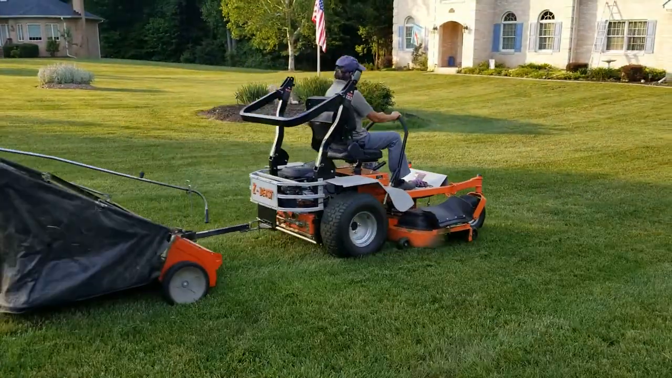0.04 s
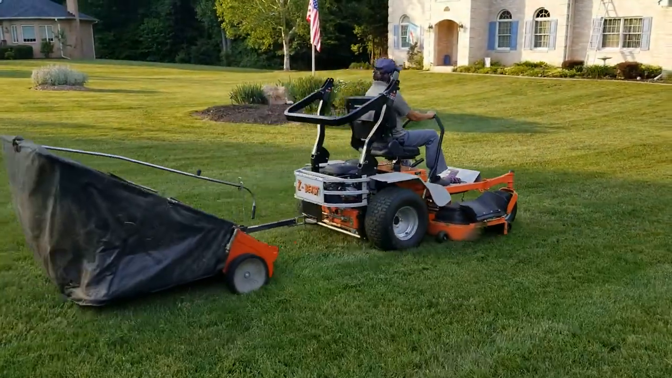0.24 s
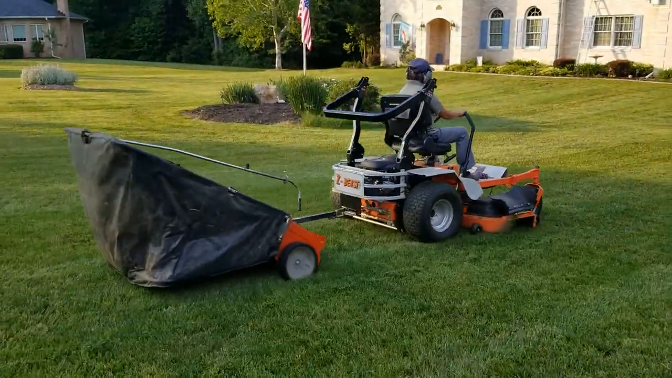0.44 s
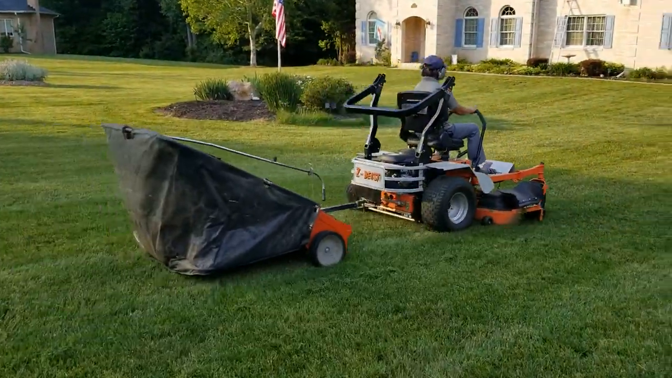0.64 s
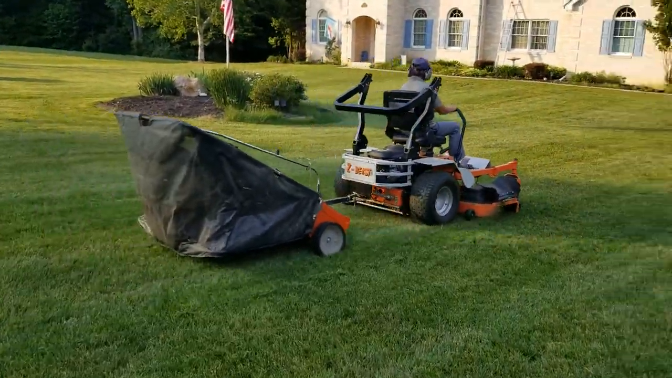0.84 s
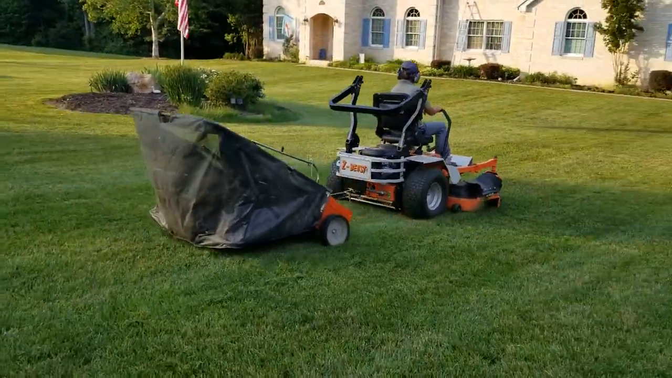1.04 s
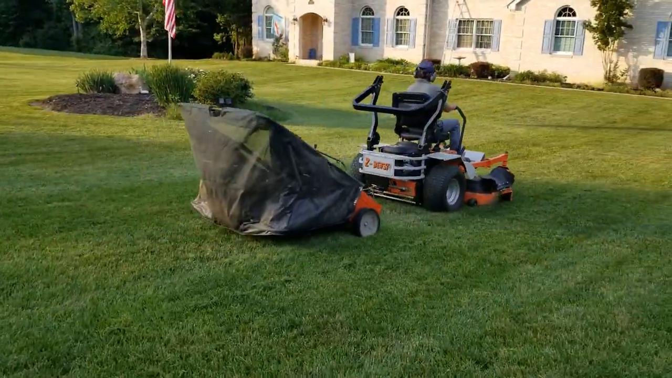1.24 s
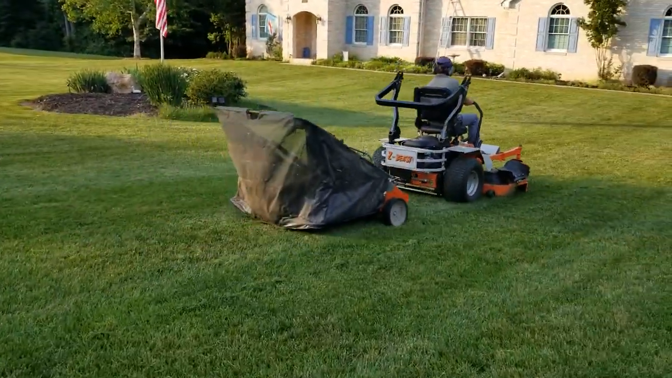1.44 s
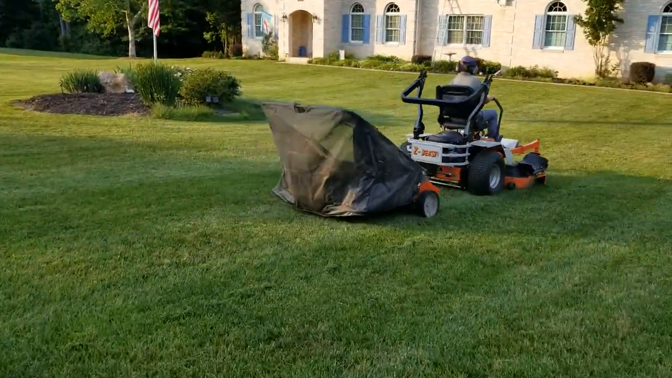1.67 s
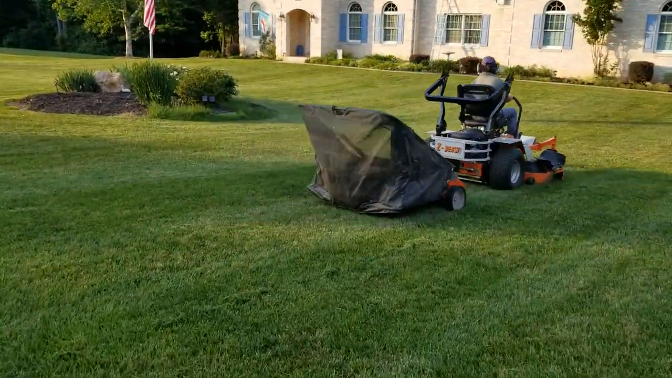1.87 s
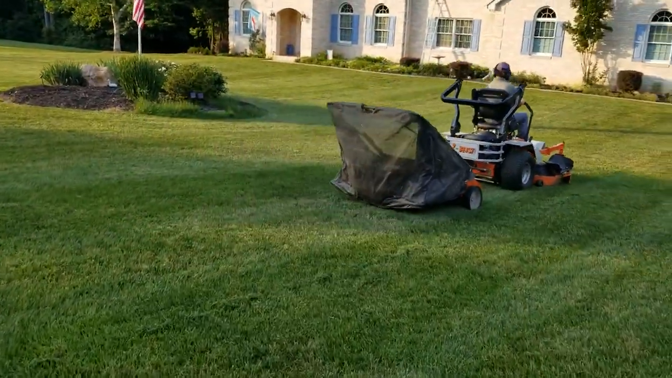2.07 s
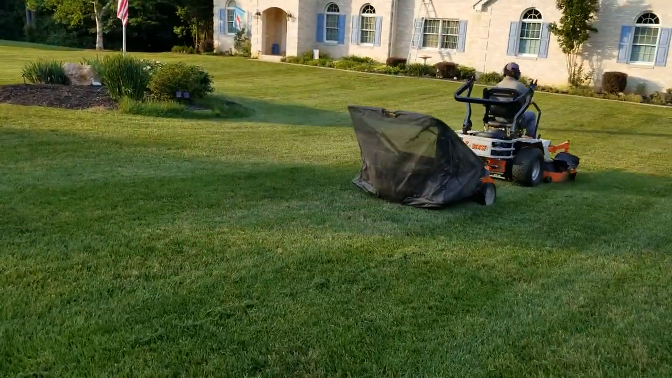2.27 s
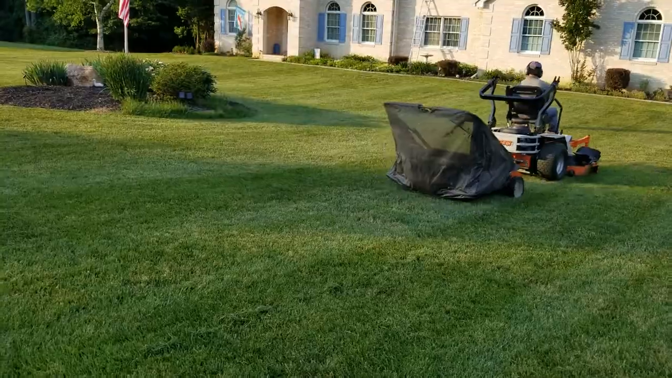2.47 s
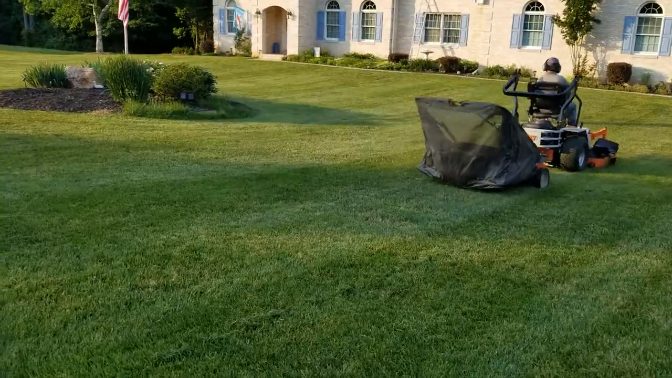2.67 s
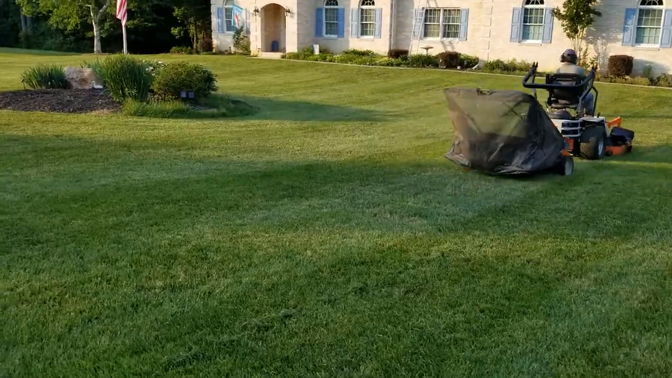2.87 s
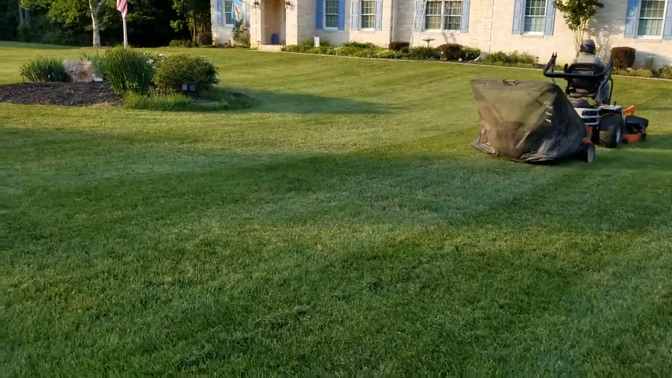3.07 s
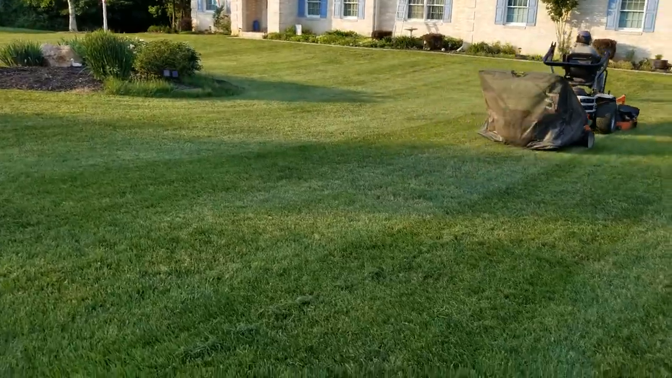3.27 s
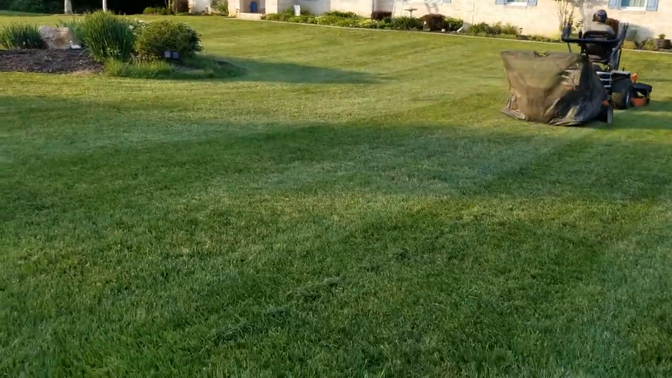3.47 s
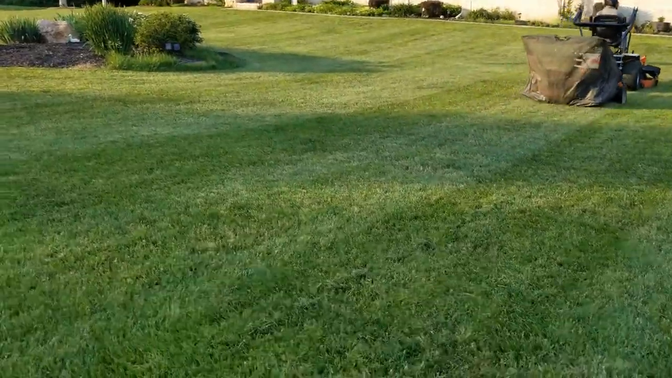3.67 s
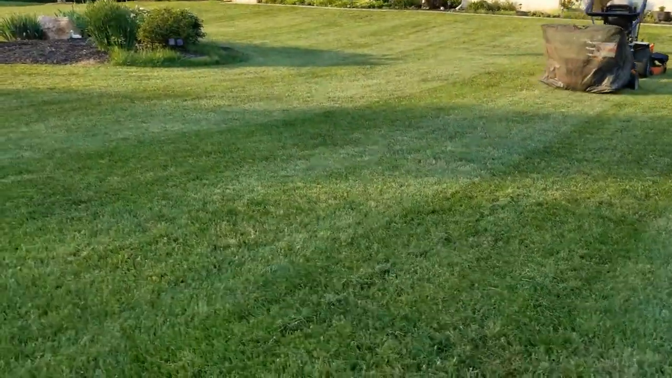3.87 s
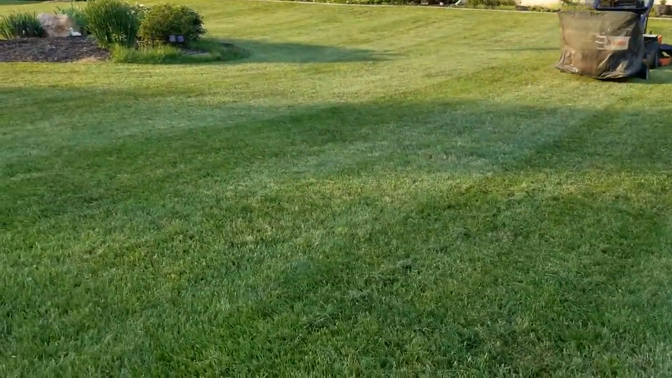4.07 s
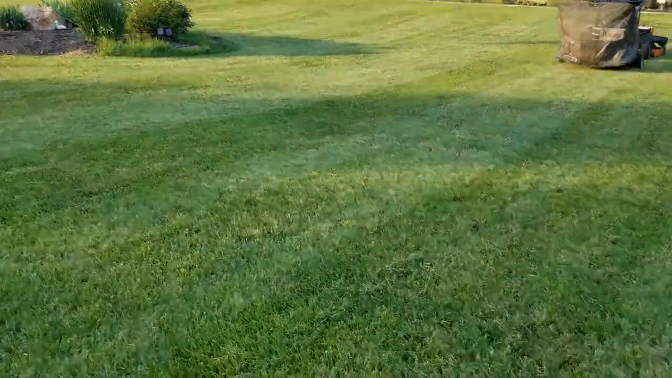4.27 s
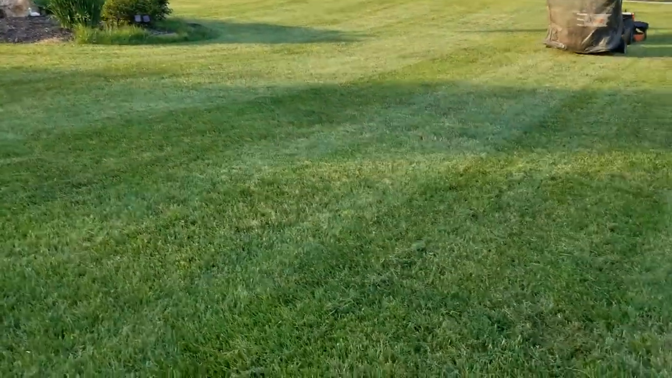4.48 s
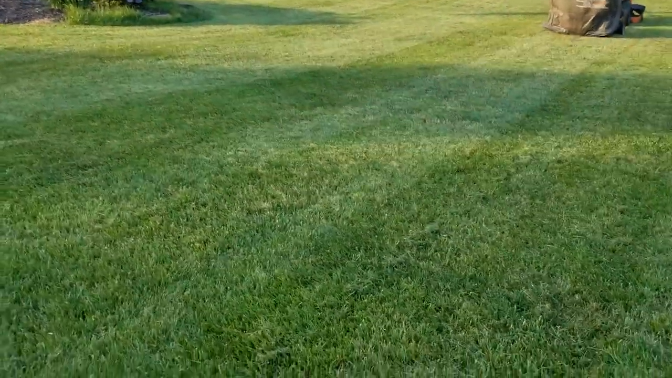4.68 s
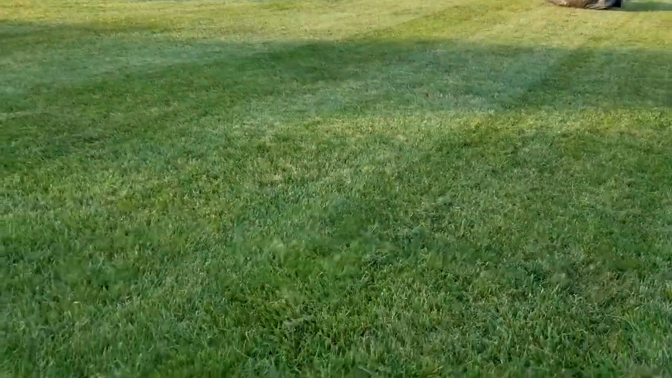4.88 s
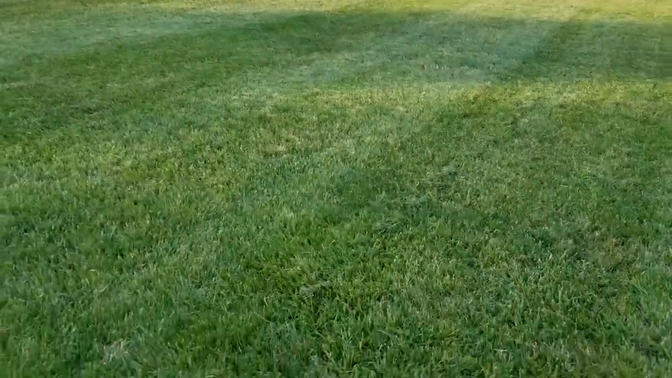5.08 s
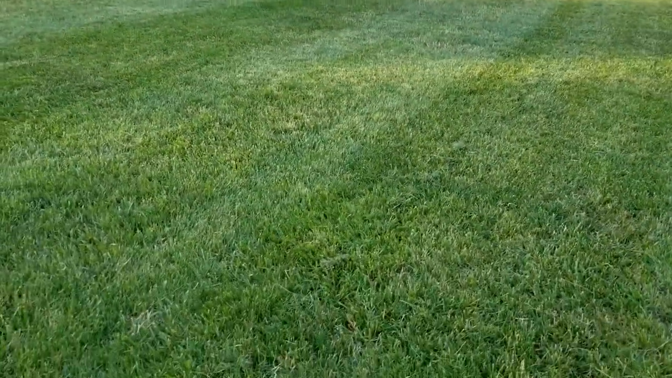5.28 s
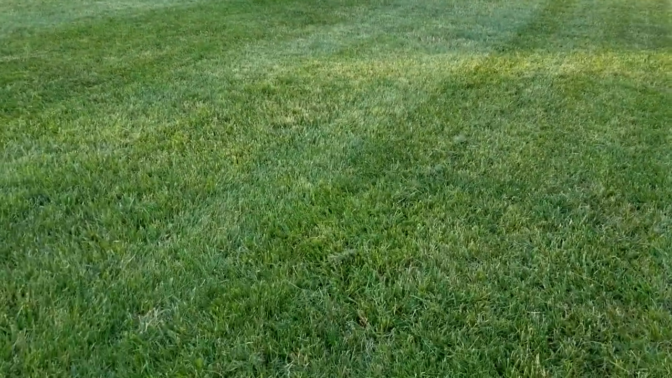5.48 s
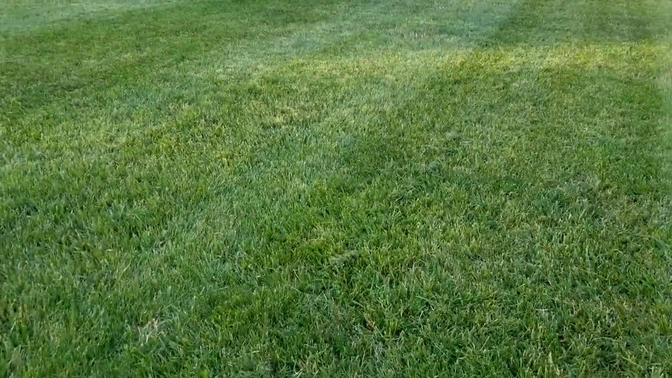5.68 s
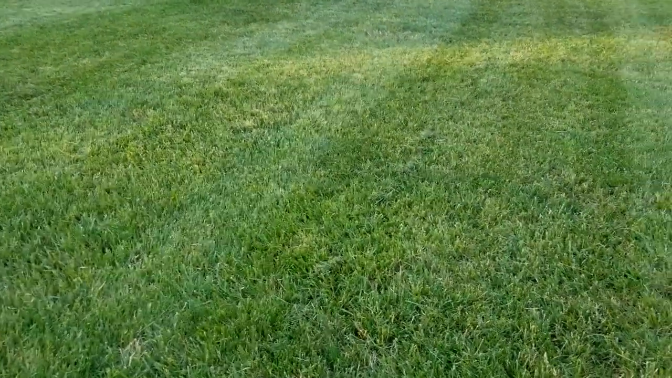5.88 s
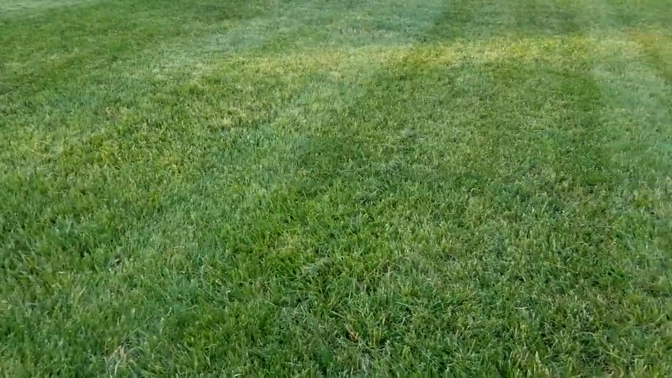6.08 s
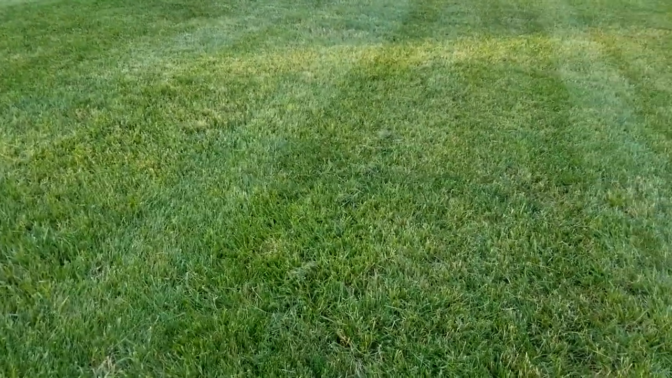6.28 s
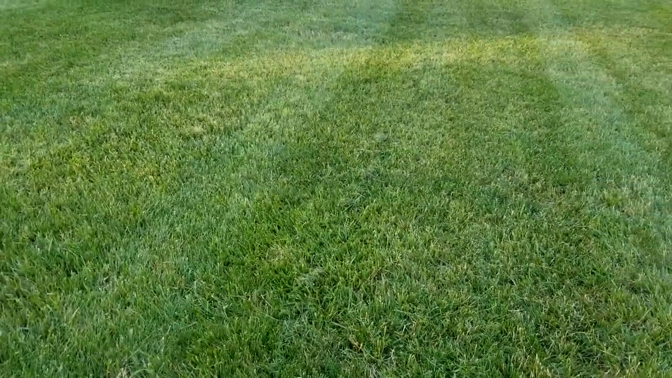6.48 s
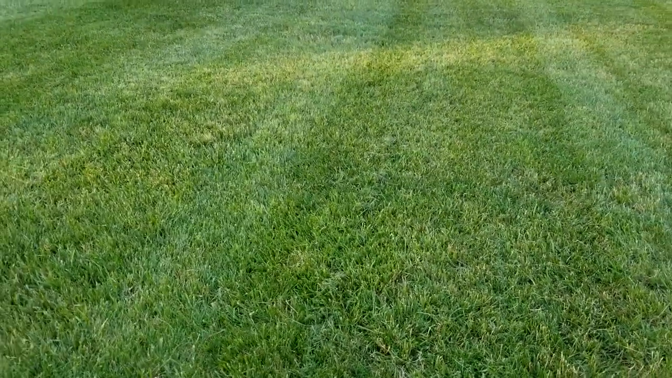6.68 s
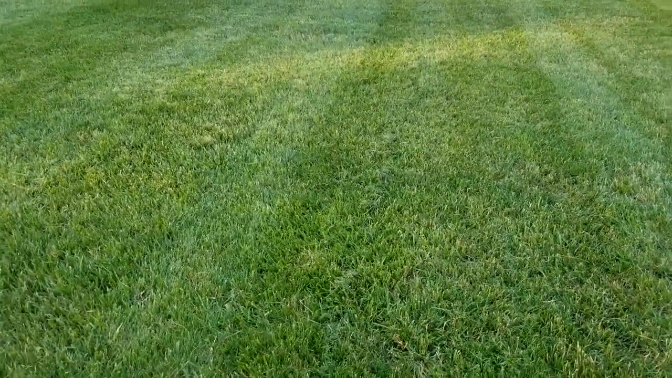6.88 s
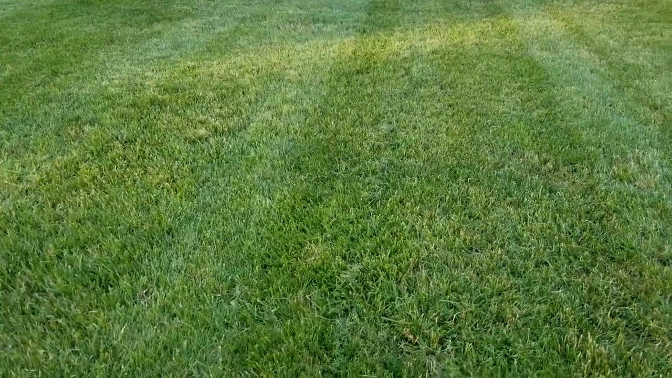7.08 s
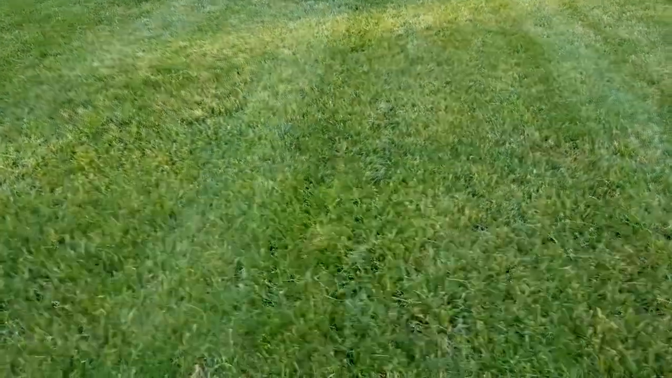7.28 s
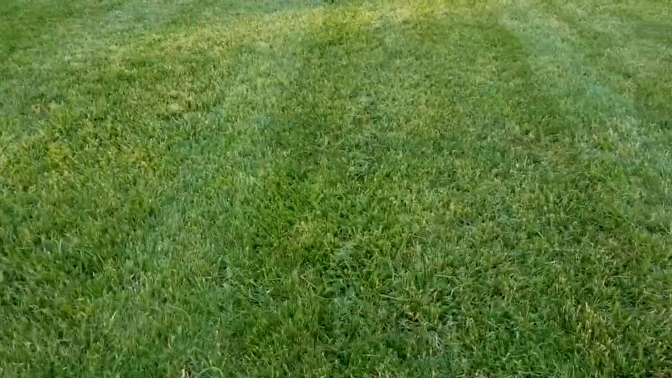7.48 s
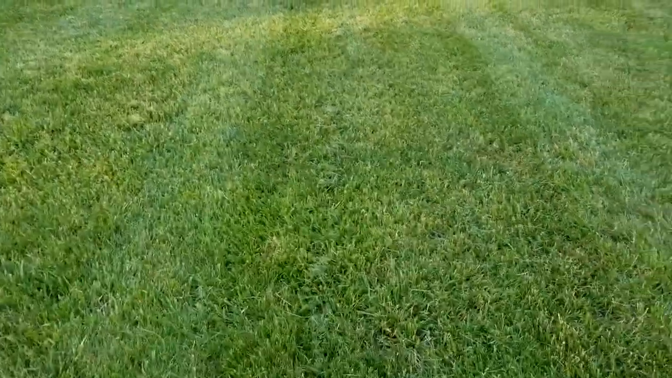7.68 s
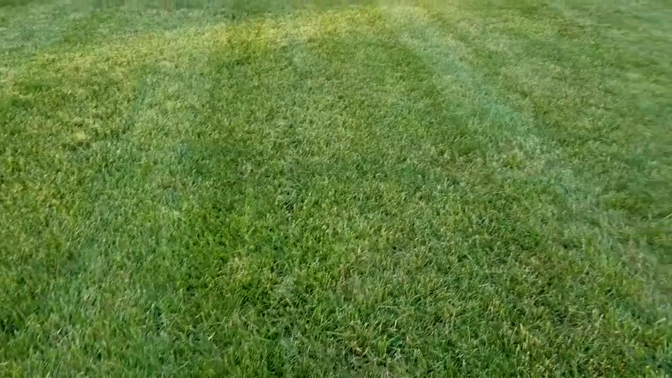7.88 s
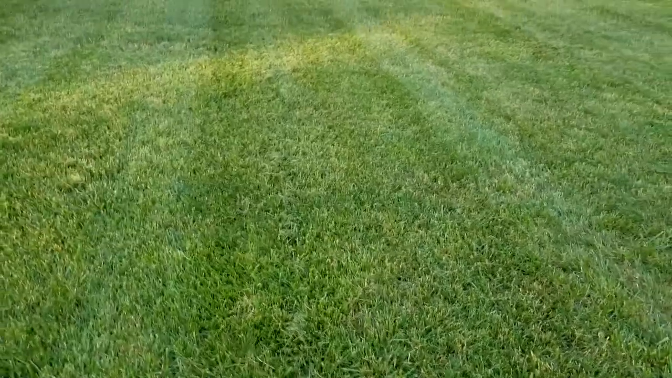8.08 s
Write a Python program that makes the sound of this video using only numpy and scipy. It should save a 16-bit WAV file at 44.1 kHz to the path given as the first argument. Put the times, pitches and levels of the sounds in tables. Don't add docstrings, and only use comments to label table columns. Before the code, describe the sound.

A ride-on petrol mower towing a lawn sweeper throbs and roars close by, then drives away over grass, fading to a distant low drone.

```python
import sys
import numpy as np
from scipy import signal
from scipy.fft import rfft, irfft
from scipy.io import wavfile
from scipy.ndimage import uniform_filter1d

SR = 44100
rng = np.random.default_rng(int(sys.argv[2]) if len(sys.argv) > 2 else 0)


def materialize(psi):
    bounded = np.clip(np.atleast_2d(psi).T, -1, 1)
    quanta = np.round(bounded * 32767).astype(np.int16)
    wavfile.write(sys.argv[1], SR, quanta)


def gain_from_db(level_db):
    decades = np.asarray(level_db, float) / 20
    return 10 ** decades


N = 358533
HOP = 256


def evened(x):
    return x / np.sqrt(np.mean(x ** 2) + 1e-20)


def read(points, hz):
    f, value = np.transpose(points)
    return np.interp(np.log(hz + 1), np.log(f + 1), value)


def curves(rows, t):
    s, *columns = np.transpose(rows)
    return np.array([np.interp(t, s, column) for column in columns])


def wander(hz):
    steps = rng.standard_normal(400)
    return np.interp(np.arange(N) / SR * np.clip(hz, .1, 40), np.arange(400), steps)


def swell(x, centre, width):
    return np.exp(-(2 * (x - centre) / width) ** 2)


# time in seconds, view (0 beside, 1 behind, 2 far).
VIEW_PATH = [(0, 0.066), (1.7, 0.0051), (2.2, 0.61), (2.7, 0.74), (3.1, 0.8), (5.5, 1.15), (5.85, 1.53),
             (8.13, 1.68)]


def view_at(t):
    return curves(VIEW_PATH, t)[0]


def by_view(view, versions, at=(0, 1, 2)):
    share = np.array([np.interp(view, at, row) for row in np.eye(len(at))])
    return np.transpose(versions) @ share


# time in seconds, speed in engine cycles per second.
ENGINE_SPEED = [(0.25, 28.74), (1.15, 29.87), (1.45, 30.14), (1.75, 29.95), (2.05, 29.565), (2.95, 28.99),
                (3.25, 29.03), (3.55, 29.26), (3.85, 29.17), (4.45, 29.15), (5.05, 29.38), (5.65, 29.155),
                (6.25, 29.16), (6.55, 29.03), (6.85, 29.16), (7.45, 29.86), (7.75, 30.48), (7.95, 30.52)]


def engine_speed(t):
    return curves(ENGINE_SPEED, t)[0]


# time in seconds, level in dB.
SILENCER_NOTE = [(0.0, -24), (0.04, -21), (0.77, -19.5), (1.02, -22.5), (2.81, -20.5), (4.44, -23.5),
                 (4.57, -22), (4.82, -25.5), (5.16, -23.5), (5.34, -27.5), (5.62, -23), (5.8, -26.5),
                 (6.52, -24.5), (6.7, -28), (7.06, -23), (7.45, -29), (7.88, -25.5), (8.13, -28.5)]
# starting level in dB, loss in dB per second, gain behind the pipe in dB,
# drift in dB, change after the last turn in dB.
ORDER_GROUPS = [
    (-33.5, 0.93, -1, 0.8, 2.5),
    (-28.5, 1.2, 4.5, 2, 0.7),
    (-33, 1.87, 2.5, 2.5, -10),
]
TURN_S, TURN_LENGTH_S = 7.6, 0.27
FIRING_DB, FIRING_HZ = 0.7, 27.13


def order_levels(t):
    behind = np.interp(view_at(t), (0, 1, 2), (0, 1, 0))
    turned = np.clip((t - TURN_S) / TURN_LENGTH_S + .5, 0, 1)
    deep, upper, top = (
        start_db - fade_db * t + pipe_db * behind + drift_db * wander(5) + turn_db * turned
        for start_db, fade_db, pipe_db, drift_db, turn_db in ORDER_GROUPS)
    stroke = wander(FIRING_HZ)
    stroke_db = FIRING_DB * (stroke - uniform_filter1d(stroke, SR // 8))
    note = curves(SILENCER_NOTE, t)[0]
    return np.array([deep, note + stroke_db, upper + stroke_db, top + stroke_db])


# order (multiple of the cycle rate),
# level curve it follows (0 deep, 1 main note, 2 upper, 3 top), level against that curve in dB.
EXHAUST_ORDERS = [(1, 0, -24), (2, 0, 0), (3, 0, -4), (4, 0, 0), (5, 1, 0), (6, 2, 0), (7, 2, -8),
                  (8, 3, 0), (9, 3, -7), (10, 3, -11), (11, 3, -21)]
# pitch in Hz, level in dB per Hz.
UNEVEN_COLOUR = [(15, -23), (45, -11), (73, -12), (100, -3.5), (118, -1), (134, 7.5), (162, -5),
                 (200, -3.5), (260, -4.5), (330, -21.5), (500, -41.5)]
# time in seconds, size against order 5 in dB.
UNEVEN_LEVEL = [(0, -16), (1.5, -15), (2.5, -12), (4, -11), (5, -11), (6.5, -13), (7.5, -16), (8.13, -14)]
SECOND_AT, SECOND_SHARE = .7625, .68


def exhaust(turns, levels_db):
    steady = np.zeros(N)
    for order, curve, db in EXHAUST_ORDERS:
        lead = np.angle(1 + SECOND_SHARE * np.exp(-2j * np.pi * order * SECOND_AT))
        level = gain_from_db(levels_db[curve] + db + wander(12) / 4)
        steady -= np.sqrt(2) * level * np.cos(order * turns + lead + wander(8.7) / 10)

    drive = 1.9 * rng.standard_normal((2, N))
    for place in (0, SECOND_AT):
        fired = np.diff(np.floor(turns / (2 * np.pi) - place), prepend=0) > 0
        drive[0, fired] += 18.0 * rng.standard_normal(400)[:fired.sum()]
    colour_db = read(UNEVEN_COLOUR, np.fft.rfftfreq(N, 1 / SR))
    uneven = evened(irfft(rfft(drive) * gain_from_db(colour_db), N))
    note_db = uniform_filter1d(levels_db[1], SR // 2)
    uneven *= gain_from_db(note_db + curves(UNEVEN_LEVEL, np.arange(N) / SR)[0])
    return steady + uneven[0], 2.1 * uneven[1]


# time in seconds, level in dB.
ROAR_LEVEL = [(0.0, -24), (0.09, -24.5), (0.11, -23.5), (1.25, -25.5), (2.33, -29.5), (2.92, -32.5),
              (4.07, -35.5), (5.57, -38), (6.18, -38), (8.13, -38.5)]
# level against the roar in dB when beside, turning, behind, far.
ROAR_PARTS = [
    (-7.5, -7, -9.5, -11.5),
    (-2.5, -2.5, -0.5, -4.5),
    (-8, -5.5, -7, -1),
    (-13, -11.5, -15.5, -15),
]
# time in seconds, length in seconds, added rustle in dB.
SCRAPES = [(0.404, .05, 0), (1.06, .05, 4.5), (1.82, .04, 5), (2.05, 0.26, 5), (2.3, 0.26, -4),
           (2.46, 0.036, 7), (3.9, .6, 0), (4.6, 0.68, 3.5), (5.65, .15, -1), (6.18, .1, 4), (6.3, .1, -3),
           (6.78, .1, 2.5), (7.2, .5, -4.5), (7.8, .12, -1)]
SCRAPE_SHARE = [0.055, 0.047, 0.26, 0.74]
# time in seconds, length in seconds, added brush hiss in dB.
BRUSH_BITES = [
    (1.2, .4, 2),
    (2.063, .2, -2.5),
    (2.36, 0.25, 3),
    (3.55, 0.36, -3),
    (3.9, 0.38, 2.5),
    (4.5, 0.31, -3),
    (5.2, 0.59, -2),
    (6.1, 1, 0),
]


def part_levels(t):
    scrape_db = sum(db * swell(t, s, length) for s, length, db in SCRAPES)
    brush_db = sum(db * swell(t, s, length) for s, length, db in BRUSH_BITES)
    shares_db = by_view(view_at(t), np.transpose(ROAR_PARTS), at=(0, .5, 1, 2))
    levels_db = curves(ROAR_LEVEL, t) + shares_db
    return levels_db + np.outer(SCRAPE_SHARE, scrape_db) + np.outer([0, 0, 1, 0], brush_db)


BEAM_S, BEAM_LENGTH_S, BEAM_HZ, BEAM_WIDTH_HZ, BEAM_DB = 3.5, 1.3, 932, 80, 6.5
DIP_S, DIP_LENGTH_S, DIP_HZ, DIP_DB = 7.75, 0.65, 3400, -4
DIP_OCTAVES_PER_S, DIP_WIDTH_OCTAVES = -1.6, .5


def passing_colour(hz, t):
    beam_db = BEAM_DB * swell(t, BEAM_S, BEAM_LENGTH_S) * swell(hz, BEAM_HZ, BEAM_WIDTH_HZ)
    octaves = np.log2(hz / DIP_HZ + 1e-3)
    dip_centre = DIP_OCTAVES_PER_S * (t - DIP_S)
    dip_db = DIP_DB * swell(t, DIP_S, DIP_LENGTH_S) * swell(octaves, dip_centre, DIP_WIDTH_OCTAVES)
    return beam_db + dip_db


# pitch in Hz, level in dB per Hz.
BESIDE_COLOUR = [(190, 0), (330, -19), (511, -10), (992, -8.5), (1240, -5), (1510, -7.5), (1870, -4),
                 (2620, -10), (3560, -4), (4850, -13), (6080, -15.5), (7750, -27), (10400, -27),
                 (12400, -36.5), (15800, -32)]
TURNING_COLOUR = [(190, -36), (330, -15), (376, -3), (435, -13.5), (684, 2), (976, -10.5), (1170, 8.5),
                  (1420, -2.5), (1540, -7), (1840, -2), (2020, -1.5), (3740, -8), (5890, -17.5),
                  (7630, -30), (15800, -27)]
BEHIND_COLOUR = [(190, -42), (330, -5), (370, -8.5), (435, -13), (563, -6), (766, -13.5), (915, -7.5),
                 (1420, -9), (1690, -10), (1900, -8.5), (2580, -10.5), (5430, -15), (7750, -32),
                 (9880, -29.5), (15800, -32)]
FAR_COLOUR = [(190, -60), (330, -10.5), (442, -24), (563, -10.5), (620, -39), (706, -9.5), (872, -10.5),
              (915, -9), (992, -16), (1130, -3.5), (2300, -10), (3620, -6), (7880, -16), (11600, -8),
              (15800, -12)]
# pitch in Hz, width in Hz,
# added level in dB when beside, behind, far.
PANELS = [(933, 41, -5.5, 2, 4.5), (630, 230, -2, -6, 0), (5970, 1500, 3, 3.5, 5),
          (1220, 170, 0.5, -9.5, 1), (1680, 120, 3.5, -4, 1.5), (2655, 150, -9, 0.5, -2.5),
          (3610, 250, 4, -1.5, 6.5), (4220, 90, 8.5, 1.5, -2)]


def roar_colour(hz, t):
    view = view_at(t)
    colours = (BESIDE_COLOUR, TURNING_COLOUR, BEHIND_COLOUR, FAR_COLOUR)
    colour_db = by_view(view, [read(colour, hz) for colour in colours], at=(0, .5, 1, 2))
    for centre, width, *db in PANELS:
        colour_db += by_view(view, db) / (1 + (2 * (hz[:, None] - centre) / width) ** 2)
    return colour_db


def roar_unrest(hz, t):
    patches, streaks = rng.standard_normal((2, len(hz), len(t)))
    patches = evened(uniform_filter1d(uniform_filter1d(patches, 10, 0), 16, 1))
    streaks = evened(uniform_filter1d(uniform_filter1d(streaks, 3, 0), 70, 1))

    def bursts(hold):
        return evened(signal.lfilter([1], [1, -hold], rng.exponential(1, len(t)) ** 2 - 2))

    gusts = bursts(.7) * np.clip(hz / 13000, 0, 1)[:, None] ** 2
    near = np.clip(1 - view_at(t), 0, 1)
    rattle = 1.15 * bursts(.5) * np.exp(-np.log(hz[:, None] / 1300 + 1e-3) ** 2) * near
    return 0.81 * patches + 1.4 * streaks + .9 * gusts + rattle


PART_EDGES_HZ = [330, 800, 2600, 8500, 15900]
PART_CENTRES_HZ = [520, 1450, 4500, 11500]
FLUTTER_DB, FLUTTER_HZ = [0.89, 0.91, 0.84, 1.04], 23.95
ROAR_LOW_HZ = 170


def roar(turns):
    hz = np.fft.rfftfreq(4 * HOP, 1 / SR)
    t = np.arange(N // HOP + 5) * HOP / SR
    colour_db = roar_colour(hz, t)
    power = gain_from_db(colour_db) ** 2
    edges = zip(PART_EDGES_HZ, PART_EDGES_HZ[1:])
    part_power = [power[(hz >= low) & (hz < high)].sum(0) for low, high in edges]
    flutter_db = [db * np.interp(t, np.arange(N) / SR, wander(FLUTTER_HZ)) for db in FLUTTER_DB]
    gain_db = part_levels(t) + flutter_db - 10 * np.log10(part_power)
    spread = np.array([read(list(zip(PART_CENTRES_HZ, row)), hz) for row in np.eye(4)])

    size = gain_from_db(colour_db + passing_colour(hz[:, None], t) + spread.T @ gain_db + roar_unrest(hz, t))
    size = size * np.clip(hz / ROAR_LOW_HZ, 0, 1)[:, None] ** 4
    real, imaginary = rng.standard_normal((2, 2, len(hz), len(t)))
    spectra = size * (real + 1j * imaginary)
    both = signal.istft(spectra, nperseg=4 * HOP, noverlap=3 * HOP)[1][:, :N]
    throb_db = 0.83 * np.cos(turns + 2.0) + .35 * np.cos(2 * turns + 4.8)
    return both * gain_from_db(throb_db + 2.0)


# order (multiple of the cycle rate),
# level against the casing roar in dB when beside, behind, far.
WHINE_TONES = [(23.92, -16, -35, -39), (28.47, -18, -15, -38), (31.9, -16.5, -13, -13),
               (35.1, -17, -30, -36), (40, -11, -15, -9), (41.1, -34, -16, -35), (43.4, -12, -15.5, -16),
               (48, -14, -11, -16), (56.1, -12.5, -29, -16), (63.2, -13, -37, -25), (67, -15, -22, -26),
               (120.5, -47, -54, -31), (135, -24, -36, -30)]


def whine(turns, t):
    view, casing_db, speed = view_at(t), part_levels(t)[1], engine_speed(t)
    out = np.zeros(N)
    for order, *db in WHINE_TONES:
        level_db = casing_db + by_view(view, db, at=(.3, 1, 2))
        level_db = level_db + passing_colour(order * speed, t) + 1.3 * wander(7)
        blur = order / 30 * wander(22)
        out += np.sqrt(2) * gain_from_db(level_db) * np.sin(order * turns + blur)
    return out


# time in seconds, peak level in dB, pitch in Hz.
PLATE_KNOCKS = [(0.0952, -20, 1310), (0.3812, -18, 1150), (0.5132, -14, 1270), (0.6484, -16, 1210),
                (0.7512, -16, 1210), (0.7858, -12, 1220), (0.9103, -13, 1260), (1.068, -20, 1230),
                (1.2695, -22, 1210), (1.349, -20, 1220), (1.3818, -22, 1204), (1.4351, -21, 1200),
                (1.5549, -23, 1220), (1.8173, -23, 1220)]
KNOCK_RISE_S, KNOCK_T60_S, KNOCK_DB = 0.0027, 0.059, -4.5


def knocks():
    out, t = np.zeros(N), np.arange(3000) / SR
    for s, db, hz in PLATE_KNOCKS:
        fade = gain_from_db(db + KNOCK_DB - 60 * t / KNOCK_T60_S)
        ring = np.minimum(t / KNOCK_RISE_S, 1) * fade * np.sin(2 * np.pi * hz * t)
        out[round(s * SR):][:len(t)] += ring
    return out


# time in seconds, peak level in dB, pitch in Hz.
TWIG_TICKS = [(1.0224, -25.5, 14900), (1.1907, -21, 8840), (1.8113, -14, 10700), (2.4433, -28, 10100),
              (3.5648, -41, 10100), (4.0911, -33, 11700), (4.3889, -39, 13500), (4.4523, -31, 9970),
              (5.1926, -35, 14200), (6.3375, -42, 7490)]


def ticks():
    out, t = np.zeros(N), np.arange(600) / SR
    for s, db, hz in TWIG_TICKS:
        ring = gain_from_db(db - 11.0 - 60 * t / 0.021) * np.sin(2 * np.pi * hz * t)
        out[round(s * SR):][:len(t)] += ring
    return out


# time in seconds, lag of the left port behind the right in samples.
BEARING = [(0, -1.1), (1.2, .8), (2, 4), (2.5, 7.5), (3.2, 9.5), (4, 9), (5.6, 5.2), (6.2, 1.2),
           (7.3, -1.3), (8.13, -7)]
# pitch in Hz, left minus right in dB.
LEFT_BALANCE = [
    [(60, 2.5), (120, 2.5), (240, 2.5), (480, 2.0), (950, 1.5), (1890, 1.0), (3770, 4.5), (7520, 9.0),
     (15000, 6.0)],
    [(60, 2.5), (120, 2.5), (240, 2.5), (480, 3.0), (950, 1.5), (1890, -1.0), (3770, 1.5), (7520, 3.5),
     (15000, 0.5)],
    [(60, 2.5), (120, 2.5), (240, 2.5), (480, 3.0), (950, 1.5), (1890, 1.0), (3770, 0.5), (7520, 8.0),
     (15000, 3.5)],
]
# pitch in Hz, likeness from 0 to 1 beside, likeness farther off.
LIKENESS = [(60, .95, .95), (130, .98, .98), (400, .92, .94), (1200, .92, .91), (1900, .82, .84),
            (2600, .55, .7), (3500, .45, .8), (4700, .3, .65), (6500, .25, .35), (9000, .15, .38),
            (13000, .12, .28)]
# pitch in Hz, lead of the left in radians.
PORT_PHASE = [(0, 0), (4800, 0), (6000, 3.1), (7300, 5.0), (9200, 6.3), (16000, 6.3)]


def ports(direct, other):
    hz, t, (z, w) = signal.stft([direct, other], SR, nperseg=4 * HOP, noverlap=3 * HOP)
    view, lag = view_at(t), curves(BEARING, t)[0]
    left_db = by_view(view, [read(side, hz) for side in LEFT_BALANCE])
    left_db = left_db * (1 + 0.37 * np.clip(hz / 4000, 0, 1))[:, None]
    bend = 1.15 - .33 * np.clip(hz / 3000, 0, 1)
    angle = read(PORT_PHASE, hz)[:, None] / 2 - np.pi * (hz * bend)[:, None] * lag / SR
    tilt = gain_from_db(left_db / 2) * np.exp(1j * angle)

    like_hz, *likeness = np.transpose(LIKENESS)
    near, far = (np.interp(np.log(hz + 1), np.log(like_hz), column) for column in likeness)
    apart = np.sqrt((1 - np.clip(by_view(view, [near, far, far]), 0, 1)) / 2)
    shared = np.sqrt(1 - apart ** 2)
    pair = np.array([(shared * z + apart * w) * tilt, (shared * z - apart * w) / tilt])

    # delay in seconds, share
    echo = [1 + share * np.exp(-2j * np.pi * hz * s) for s, share in ((.0022, 0.13), (0.001794, 0.16))]
    treble = np.clip(hz / 1500, 0, 1)
    pair *= (np.array(echo) * treble + 1 - treble)[:, :, None]
    return signal.istft(pair, SR, nperseg=4 * HOP, noverlap=3 * HOP)[1][:, :N]


def scene():
    t = np.arange(N) / SR
    speed = uniform_filter1d(engine_speed(t), SR // 5)
    turns = 2 * np.pi * np.cumsum(speed) / SR + 5.1
    thump, scattered = exhaust(turns, order_levels(t))
    noise, other_noise = roar(turns)
    tones = whine(turns, t) + knocks() + ticks()
    direct = thump + tones + noise
    other = scattered + other_noise + np.roll(tones, 75)
    return ports(direct, other)


def band_limit(x):
    return signal.sosfilt(signal.butter(12, 17010, fs=SR, output="sos"), x)


def record(dry):
    edge = signal.firwin(511, 15950, window=("kaiser", 9), fs=SR)
    mix = signal.oaconvolve(dry, edge[None], "same")
    return band_limit(mix)


dry = scene()
out = record(dry)
materialize(out)
```